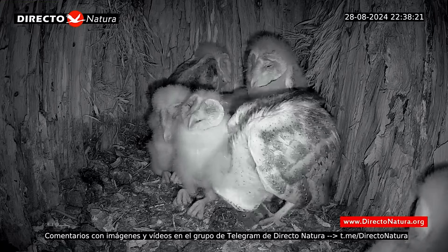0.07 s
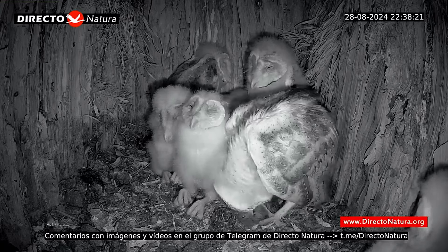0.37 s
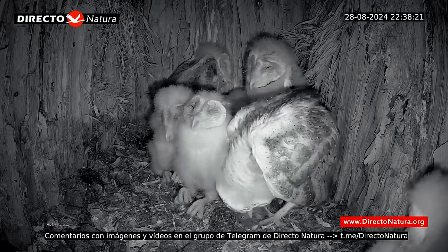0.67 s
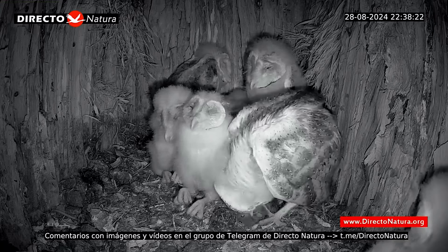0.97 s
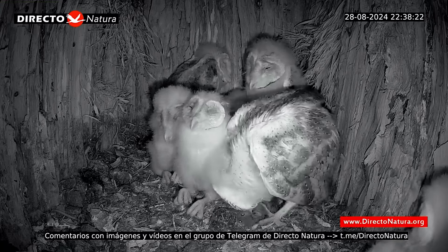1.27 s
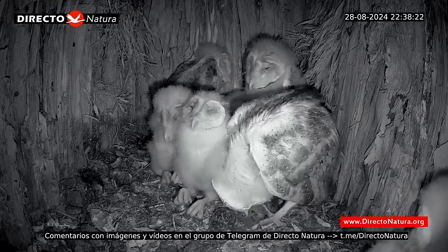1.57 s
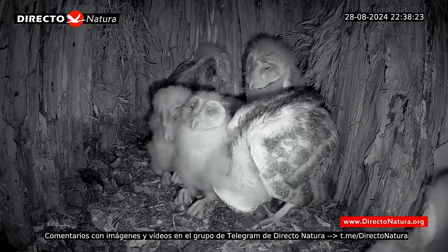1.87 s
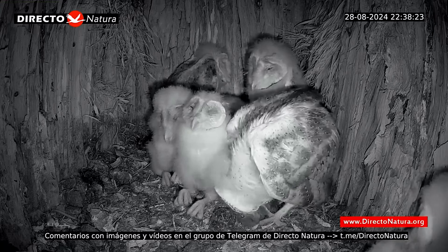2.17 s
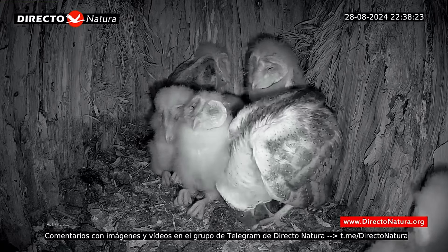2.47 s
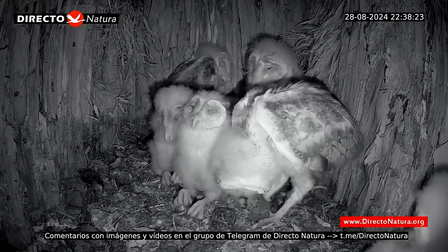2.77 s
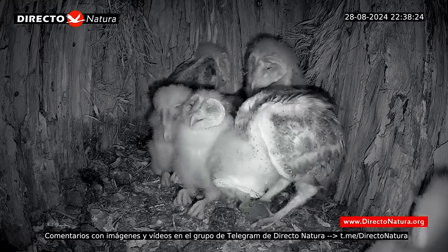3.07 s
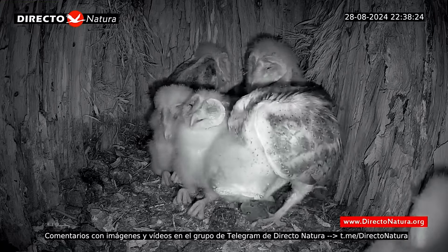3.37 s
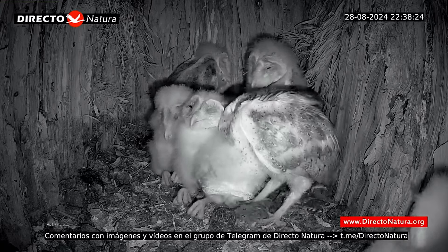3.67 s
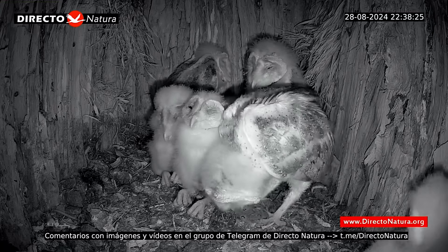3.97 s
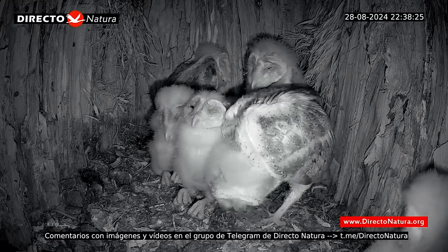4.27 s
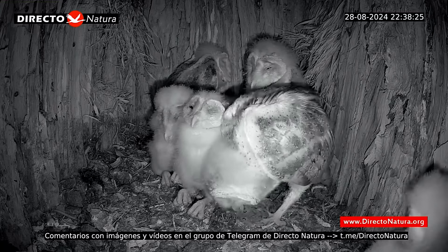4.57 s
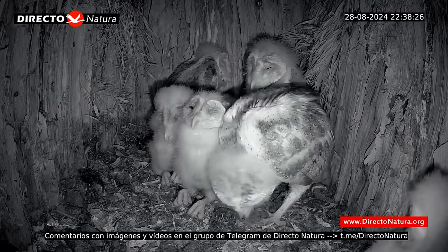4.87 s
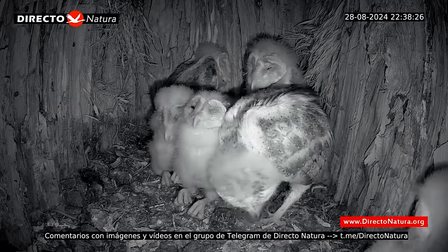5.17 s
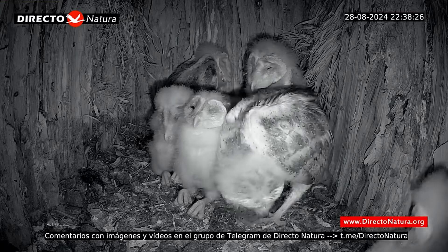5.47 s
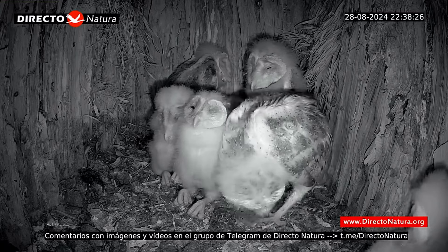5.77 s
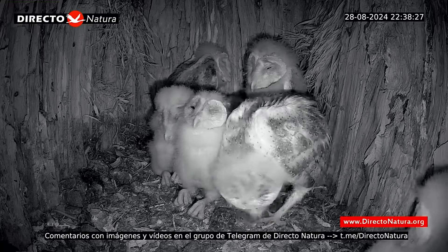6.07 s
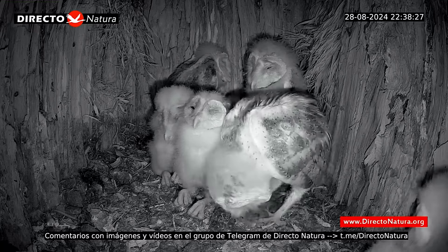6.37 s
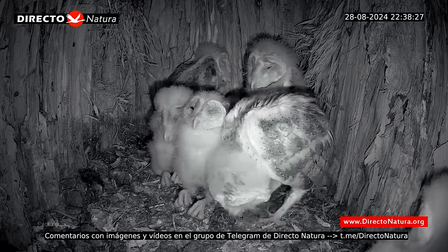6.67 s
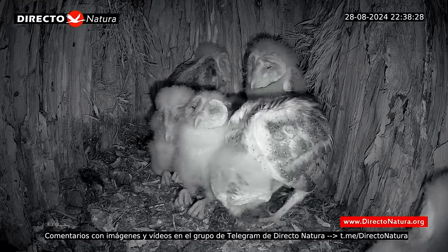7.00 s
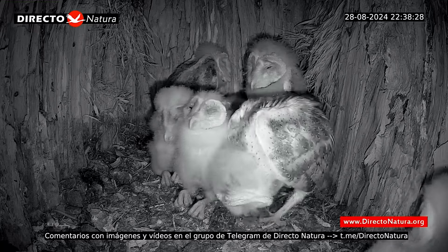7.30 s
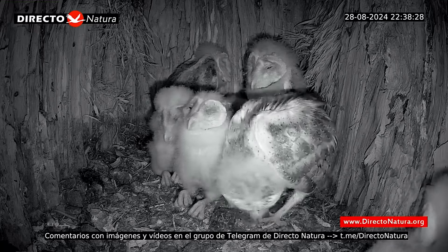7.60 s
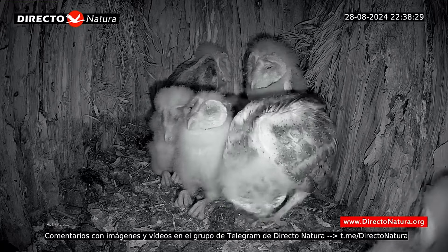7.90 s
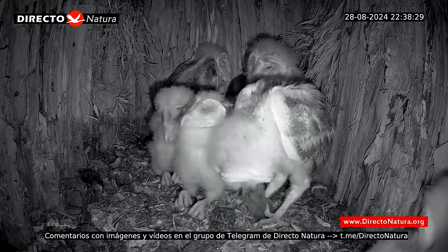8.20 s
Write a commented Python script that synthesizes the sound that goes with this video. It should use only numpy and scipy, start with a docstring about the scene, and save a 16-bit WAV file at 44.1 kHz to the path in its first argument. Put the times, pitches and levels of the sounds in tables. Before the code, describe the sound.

A barn owl is already screeching at the start, close to the microphone inside a hollow tree: a harsh, hissing rasp that breaks off at about 0.5 seconds with a tiny falling whistle. A beak clicks once at 1 second. Three soft, dull bumps of feet on nest litter follow between 2.3 and 2.6 seconds. At 3 seconds a second screech opens with a tiny chirp, swells, and ends the same way at 3.8 seconds. These two calls are by far the loudest sounds and have almost no echo. Barely audible taps come near 5, 6.8 and 7.2 seconds. Throughout, a distant diesel engine hums and clatters very faintly, drifting in level, under a soft steady hiss. A very faint low whine sinks slightly and dies away by about 2 seconds.

```python
"""Barn owls in a hollow tree at night

Close to a nest microphone, one bird gives two harsh screeches: its syrinx oscillates chaotically
in turbulent air, throat and hollow resonate, and as the effort drops the rasp breaks into a short
falling whistle. A beak clicks and feet bump on the litter. Far away the periodic firings of a
diesel engine hum and clatter, and a faint whine sinks and dies away."""
import sys
import numpy as np
from scipy import signal
from scipy.fft import rfft, irfft, next_fast_len
from scipy.io import wavfile

SR = 44100
rng = np.random.default_rng(int(sys.argv[2]) if len(sys.argv) > 2 else 0)


def wrap_up_sound(samples):
    """Save the sound to the file named by the first command line argument, as 16-bit audio."""
    columns = np.atleast_2d(samples).T
    # keep every value between -1 and 1, then stretch to whole-number steps
    tamed = np.clip(columns, -1, 1)
    steps = np.round(tamed * 32767).astype(np.int16)
    wavfile.write(sys.argv[1], SR, steps)


N = 363384
TIME = np.arange(N) / SR
FFT_SIZE = 2 * next_fast_len(N // 2 + 4096)
HZ = np.arange(FFT_SIZE // 2 + 1) * SR / FFT_SIZE
CYCLE_HZ = 11.715   # engine cycles, six firings each
CATCH_LEAD_S = 0.011   # the voice catches this long before it breaks

# Resonances of throat, beak and hollow: f/Hz, half width/Hz, relative level/dB
CAVITY_MODES = [(330, 101, -16.5), (629, 139, -9.0), (561, 59, -8.0), (878, 181, -2.0), (1041, 39, -6.0),
                (1236, 93, -1.0), (1487, 177, -3.5), (1848, 263, -3.0), (2132, 249, -5.0),
                (2559, 149, -9.5), (2780, 115, -2.5), (2984, 254, -2.5), (3345, 94, -10.5),
                (3590, 124, -12.5), (3856, 133, -12.5), (4095, 139, -7.0), (4372, 172, -7.5),
                (4581, 166, -3.0), (4812, 159, 0.0), (4971, 204, -2.0), (5225, 143, -4.5),
                (5581, 182, -15.5), (6110, 371, -11.0), (6487, 161, -5.0), (6652, 92, -6.5),
                (6862, 116, -10.0), (7161, 140, -6.5), (7398, 128, -3.0), (7658, 207, -6.5),
                (8279, 240, -18.0)]


def from_db(db):
    """Amplitude ratio of a level in decibels."""
    return 10 ** (np.asarray(db) / 20)


def unit_rms(x):
    """Normalisation to unit mean power."""
    return x / np.sqrt(np.mean(x ** 2) + 1e-20)


def in_time(rows):
    """Linear interpolation of each column at every sample; the first column is t/s."""
    times, *columns = np.transpose(rows)
    return [np.interp(TIME, times, column) for column in columns]


def drift(corner_hz):
    """Low-pass Gaussian noise: a smooth random fluctuation of unit power."""
    return unit_rms(irfft(rfft(rng.standard_normal(FFT_SIZE)) / (1 + (HZ / corner_hz) ** 2))[:N])


def response(modes):
    """Magnitude response of steep-sided resonances whose powers add."""
    gains = (from_db(db) / (1 + ((HZ - hz) / width) ** 2) ** 2 for hz, width, db in modes)
    return np.sqrt(sum(gain ** 2 for gain in gains))


def colour(x, gain):
    """Minimum-phase filtering: folding the cepstrum makes the given magnitude response causal."""
    cepstrum = irfft(np.log(gain + 1e-6))
    cepstrum[1:FFT_SIZE // 2] *= 2
    cepstrum[FFT_SIZE // 2 + 1:] = 0
    return irfft(rfft(x, FFT_SIZE) * np.exp(rfft(cepstrum)))[:N]


def rasp(pitch_hz, chaos, voiced, flutter_db):
    """Chaotic oscillation of the syrinx, as random frequency modulation, in a turbulent jet."""
    phase = 2 * np.pi * np.cumsum(pitch_hz * (1 + chaos * drift(500))) / SR
    membrane = unit_rms(sum(np.sin(k * phase) for k in range(1, 6)))
    return (voiced * membrane + rng.standard_normal(N)) * from_db(flutter_db * drift(90))


def screech(source, start, end, swell_s, fade_s, level_db, treble_db, gape_db, leak_db):
    """Source and filter: the rasp excites throat and hollow, and effort brightens the spectrum."""
    gape = from_db(gape_db * response([(3500, 2100, 0)]))   # a wide beak fills in the low treble
    tract = response(CAVITY_MODES) * gape + from_db(leak_db)   # air rushes between the resonances
    spectrum = rfft(colour(source, tract), FFT_SIZE)
    treble_share = 1 / (1 + (2300 / (HZ + 1)) ** 16)   # crossover at 2300 Hz
    lows, treble = (unit_rms(irfft(spectrum * share)[:N]) for share in (1 - treble_share, treble_share))
    # The bird builds up pressure, holds it and lets go; slack is 0 at full effort, 1 at none.
    building = np.exp(-np.maximum(TIME - start, 0) / swell_s)
    letting_go = np.exp(-np.maximum(end - TIME, 0) / fade_s)
    slack = np.minimum(building + letting_go, 1)
    voice = from_db(-5 * slack) * lows + from_db(treble_db - 19.5 * slack) * treble
    onset = np.clip((TIME - start) / 0.0025, 0, 1)
    release = np.exp(-np.clip((TIME - end) / 0.0074, 0, 20))
    catch_db = -18 * np.exp(-((TIME - end + CATCH_LEAD_S) / 0.0024) ** 2)
    return onset * release * from_db(level_db + catch_db) * voice


def owl():
    """Changes of regime in the syrinx: double chirp, chaotic rasp, catch with a chirp, falling whistle."""
    # Calls: start t/s, break t/s, swell/s, fade/s, lows level/dB, treble re lows/dB, gape/dB, leak/dB
    calls = [(-0.55, 0.495, 0.125, 0.044, -25, 5.5, 2.0, -37),
             (3.033, 3.786, 0.13, 0.079, -25, 5.5, 0, -42)]
    # Tones of the slack syrinx: length/s, start f/Hz, end f/Hz, level/dB, overtone gain/dB, swells
    opening_chirp = (0.016, 1490, 1510, -23.5, -16, 2)
    catch_chirp = (0.013, 1600, 1470, -28.5, -3, 2)
    closing_whistle = (0.022, 1400, 1185, -24.5, 1.5, 1)
    source = rasp(pitch_hz=1584, chaos=0.11, voiced=0.55, flutter_db=0.9)
    waver = 1 + 0.014 * drift(900)
    out = np.zeros(N)
    for start, end, *manner in calls:
        out += screech(source, start, end, *manner)
        out += whistle(waver, start, *opening_chirp)
        out += whistle(waver, end - CATCH_LEAD_S, *catch_chirp)
        out += whistle(waver, end, *closing_whistle)
    return out


def woods(calls, db, t60, dull_hz):
    """Diffuse reverberation: trees scatter the calls into a dull wash whose power decays exponentially."""
    age = TIME[:2 * SR]
    decay = (from_db(-60 * age / t60) * (1 - np.exp(-age / 0.02))) ** 2
    power = np.maximum(signal.fftconvolve(calls ** 2, decay / decay.sum())[:N], 0)
    passband = (HZ / (HZ + 500)) ** 2 / (1 + (HZ / dull_hz) ** 6)
    return from_db(db) * np.sqrt(power) * unit_rms(colour(rng.standard_normal(N), passband))


def firings(strengths_db, fade, repeat):
    """Cyclostationary noise: one decaying burst per strength in each cycle; a part repeats every cycle."""
    cycles = TIME * CYCLE_HZ + 0.0048 * drift(0.98)
    count, period = len(strengths_db), int(SR / CYCLE_HZ)
    strength = from_db(strengths_db)[np.floor(cycles * count).astype(int) % count]
    decay = np.exp(-fade * (cycles * count % 1))
    periodic = np.interp(cycles % 1 * period, np.arange(period), rng.standard_normal(period))
    return strength * decay * (repeat * periodic + rng.standard_normal(N))


def exhaust(hum_db, rumble_db, waver_db, swell_db):
    """Low harmonics of a six-cylinder diesel's cycle waver over a rumble of resonant noise."""
    # Exhaust harmonics: multiple of the cycle rate, level re hum_db/dB
    orders = [(6, -75), (8, -83.5), (10, -66), (12, -60.5), (14, -74), (15, -77)]
    # Rumble resonances: f/Hz, half width/Hz, relative level/dB
    rumble_modes = [(135, 51, 0), (300, 61, -15.5)]
    hum = np.zeros(N)
    for order, db in orders:
        amplitude = np.sqrt(2) * from_db(hum_db + db + waver_db * drift(2.5))
        hum += amplitude * np.sin(2 * np.pi * (order * CYCLE_HZ * TIME + rng.random()))
    rumble = unit_rms(colour(rng.standard_normal(N), response(rumble_modes)))
    return hum + from_db(rumble_db + swell_db * drift(3.4)) * rumble


def engine():
    """Atmospheric fading: exhaust, resonant clatter and injector ticks come and go in the night air."""
    # Fading along the path: t/s, clatter level before trim/dB, upper clatter re clatter/dB
    fading = [(0.65, -61.0, -12.5), (0.95, -61.5, -14.0), (1.45, -65.0, -3.5), (2.5, -59.5, -6.5),
              (2.95, -60.5, -4.5), (3.95, -54.0, -7.0), (4.55, -59.0, -7.5), (5.1, -62, -6.5),
              (5.5, -62.5, -14.5), (6.05, -66.0, -13.5), (6.6, -67.0, -0.5), (7.0, -64.5, -7.0),
              (7.5, -64.5, -13.5), (8.15, -63.0, -6.0)]
    # The six firings of a cycle: relative level/dB
    cylinders_db = [-0.7, 1.5, -1.0, 0.7, -1.0, 0.7]
    # Resonances of the engine's sound: f/Hz, half width/Hz, relative level/dB
    clatter_modes = [(727.5, 70, 1), (842, 80, 0.5), (918, 48, -4), (1069, 79, 1), (1263, 120, -14),
                     (4100, 350, -30), (4800, 550, -30), (6200, 1200, -36.5)]
    upper_modes = [(1525, 110, -0.5), (1641, 120, -3.5), (1860, 110, -12.5)]
    ring_modes = [(2266, 95, 0), (2420, 340, -5.5), (2700, 270, -12.5)]
    injector_modes = [(3210, 150, 0), (3010, 240, -11.5)]
    # Swells of the ring: t/s, half length/s, gain/dB
    ring_swells = [(0.88, 0.27, 7.5), (5.455, 0.4, 9.0)]
    level_db, upper_db = in_time(fading)
    swing_db = level_db - level_db.mean()   # ring and exhaust follow a share of this
    swells_db = sum(db * np.exp(-((TIME - t) / half) ** 2) for t, half, db in ring_swells)
    bands = [(level_db - 0.2, clatter_modes), (level_db + upper_db + 0.13, upper_modes),
             (-80.5 + 0.55 * swing_db + swells_db, ring_modes)]
    bursts = firings(cylinders_db, fade=1.0, repeat=0.6)
    clatter = sum(from_db(db) * unit_rms(colour(bursts, response(modes))) for db, modes in bands)
    injections = firings(np.zeros(3), fade=1.5, repeat=0.3)
    ticks = unit_rms(colour(injections, response(injector_modes)))
    hum = from_db(0.25 * swing_db) * exhaust(hum_db=-0.5, rumble_db=-64.5, waver_db=3.0, swell_db=1.0)
    return hum + clatter + from_db(-78 + 2.5 * drift(1.2)) * ticks


def hiss(db):
    """Stationary filtered noise: a faint, steady background hiss, duller towards the top."""
    # Spectrum of the background hiss: f/Hz, relative level/dB
    hiss_spectrum = [(20, -3), (300, -1), (600, 1.5), (2000, -7.5), (3600, -10.5), (4100, -9), (4800, -10),
                     (5300, -11), (7300, -14.5), (8000, -24.5), (9000, -27)]
    hz, level_db = np.transpose(hiss_spectrum)
    gain = from_db(np.interp(np.log(HZ + 1), np.log(hz), level_db))
    return from_db(db) * unit_rms(colour(rng.standard_normal(N), gain))


def whistle(waver, start, length, start_hz, end_hz, db, overtones_db, swells):
    """Periodic oscillation: at low pressure the syrinx locks into a harmonic tone that settles in pitch."""
    # Overtones: harmonic number, relative level/dB
    partials = [(2, -20), (3, -35), (4, -13), (5, -23.5), (6, -27)]
    active = (TIME > start) & (TIME < start + length)
    progress = (TIME[active] - start) / length
    hz = end_hz + (start_hz - end_hz) * (1 - progress) ** 2
    phase = 2 * np.pi * np.cumsum(hz * waver[active]) / SR
    overtones = sum(from_db(overtones_db + partial_db) * np.sin(k * phase) for k, partial_db in partials)
    swell = np.abs(np.sin(np.pi * swells * progress))
    out = np.zeros(N)
    out[active] = from_db(db) * np.sqrt(2) * swell * (np.sin(phase) + swell * overtones)
    return out


def far_whine(start_hz, end_hz, db):
    """A faint distant sinusoid, randomly modulated in level and frequency, sinks and dies away."""
    hz, level_db = in_time([(0.5, start_hz, db), (1.5, end_hz, db), (2.3, end_hz - 10, db - 21)])
    amplitude = from_db(level_db + 2 * drift(6))
    return amplitude * np.sin(2 * np.pi * np.cumsum(hz + 5 * drift(20)) / SR)


def knocks(rise_s, scuff_hz):
    """Impact excitation: each touch is a decaying noise burst, filtered by the contact and the hollow."""
    # Touches of beak and feet: t/s, level/dB, f/Hz, half width/Hz, t60/s, relative scuff level/dB
    touches = [(1.043, -34, 1400, 400, 0.018, -45), (2.256, -41, 318, 160, 0.055, -42),
               (2.455, -46.5, 320, 165, 0.078, -30), (2.573, -52, 290, 90, 0.094, -55),
               (4.95, -66, 310, 130, .1, -55), (6.759, -67, 300, 90, 0.083, -55),
               (7.168, -69, 4950, 400, .08, -55)]
    out, hollow = np.zeros(N), response(CAVITY_MODES)
    for start, db, hz, width, t60, scuff_db in touches:
        age = np.maximum(TIME - start, 0)
        envelope = (1 - np.exp(-age / rise_s)) * from_db(-60 * np.minimum(age / t60, 3))
        contact = response([(hz, width, 0), (0, scuff_hz, scuff_db)])   # the litter dulls the scuff
        out += from_db(db) * colour(envelope * rng.standard_normal(N), unit_rms(hollow * contact))
    return out


def scene():
    """Superposition in one channel: the owls in front, the night behind."""
    calls = owl()
    nest = calls + woods(calls, db=-50.5, t60=1.5, dull_hz=5800) + knocks(rise_s=0.00088, scuff_hz=2800)
    night = engine() + far_whine(start_hz=363, end_hz=342, db=-74.5)
    return (nest + night + hiss(db=-76.5))[None]


def record(dry):
    """Band limiting: a steep low-pass filter removes the treble above the cut-off."""
    cutoff_hz = 8750
    return signal.sosfilt(signal.ellip(12, 0.1, 80, cutoff_hz, fs=SR, output="sos"), dry)


dry = scene()
out = record(dry)
wrap_up_sound(out)
```